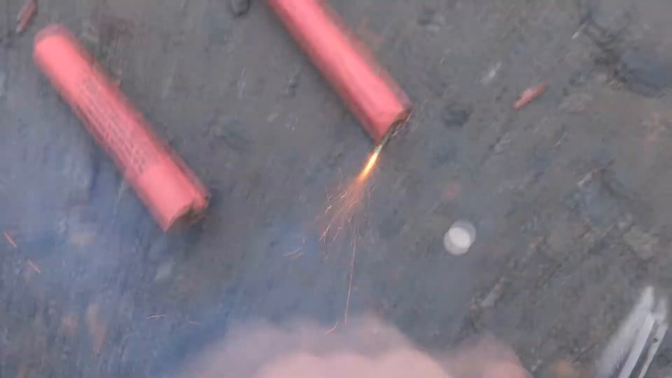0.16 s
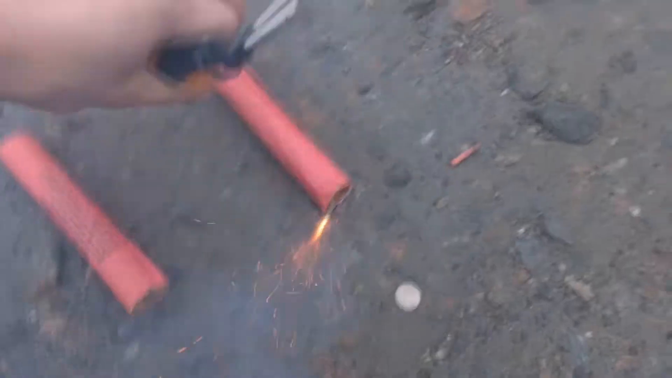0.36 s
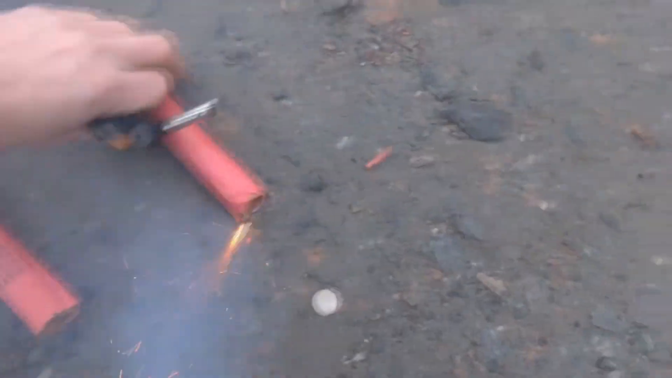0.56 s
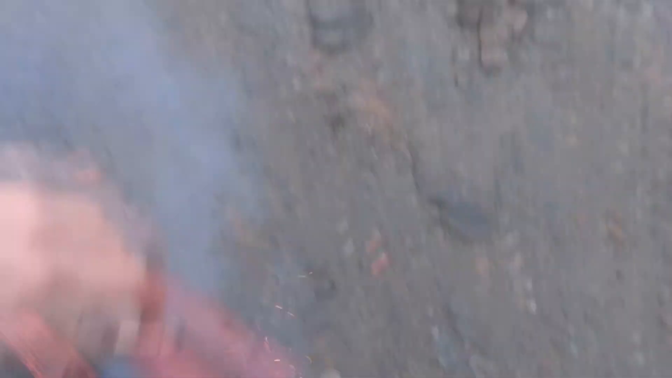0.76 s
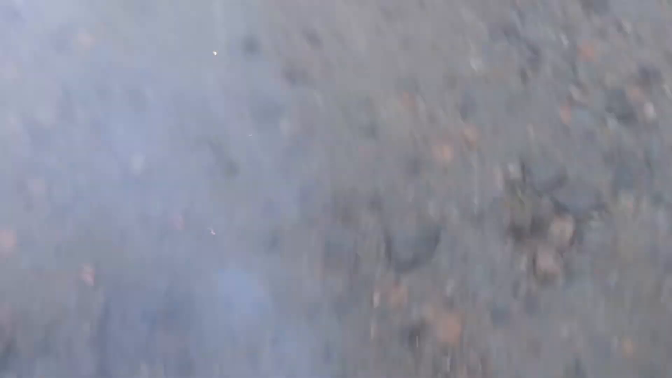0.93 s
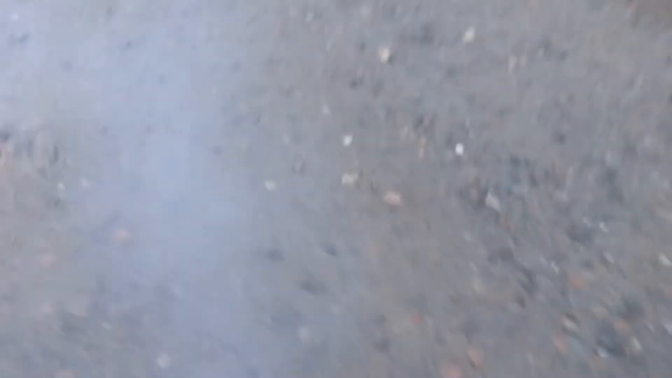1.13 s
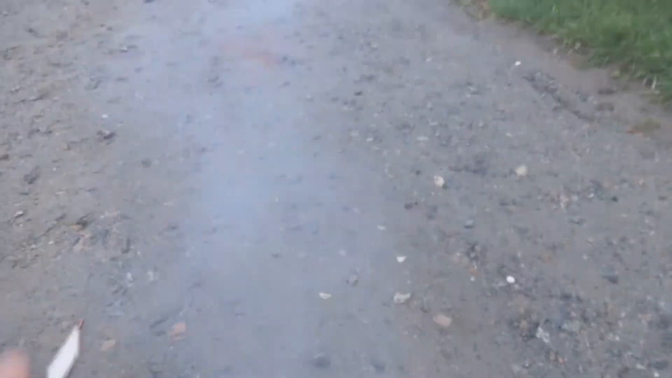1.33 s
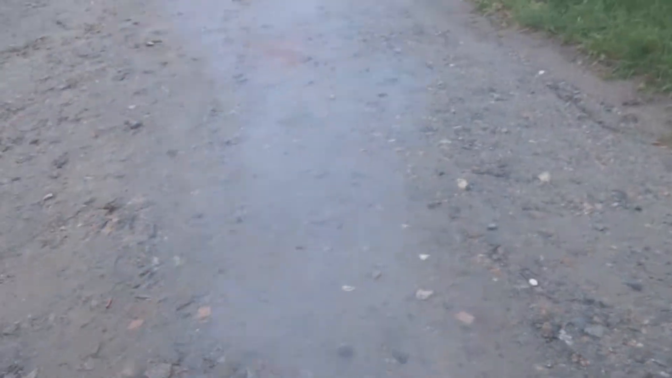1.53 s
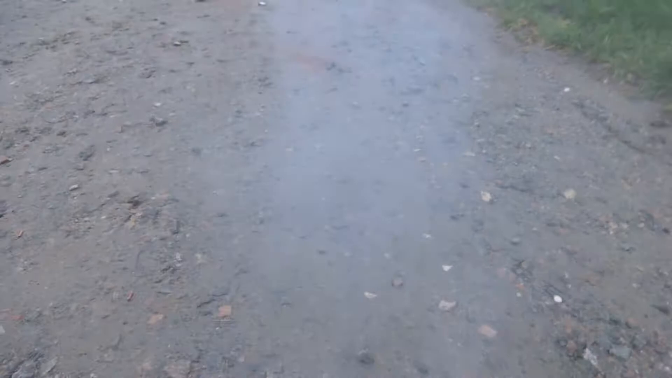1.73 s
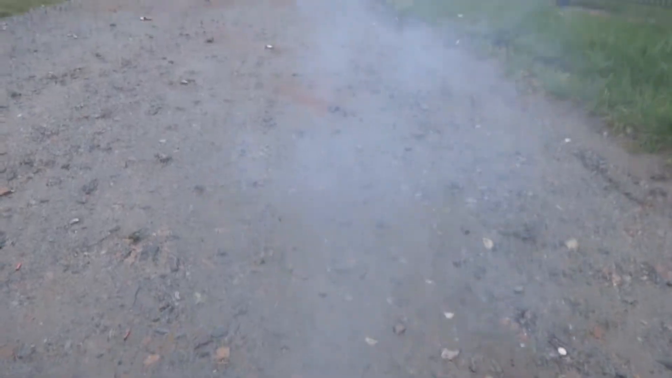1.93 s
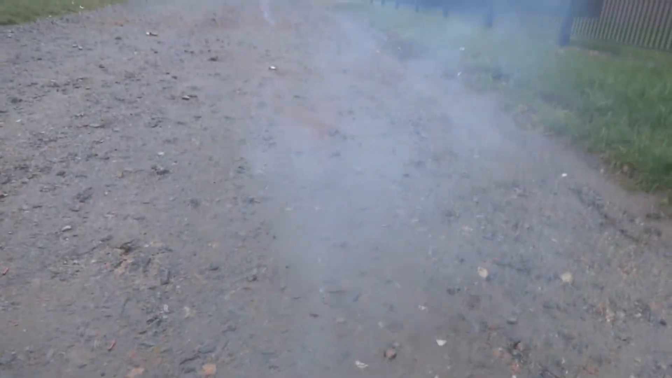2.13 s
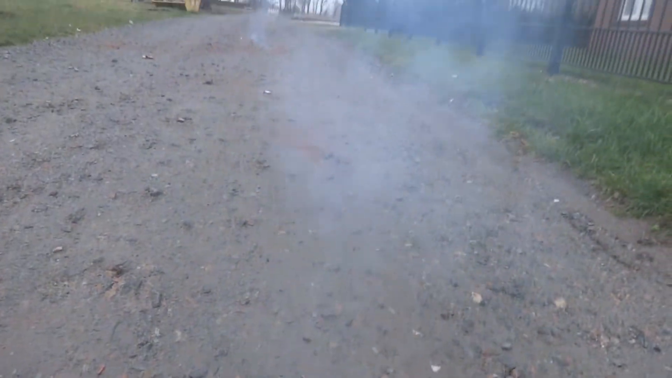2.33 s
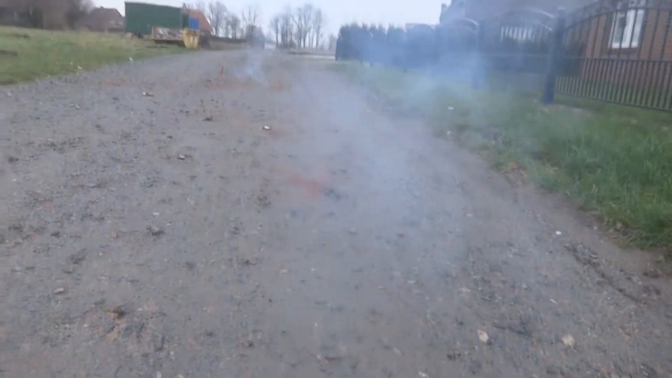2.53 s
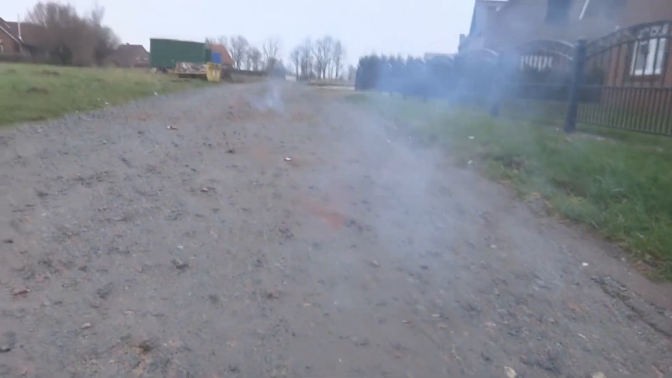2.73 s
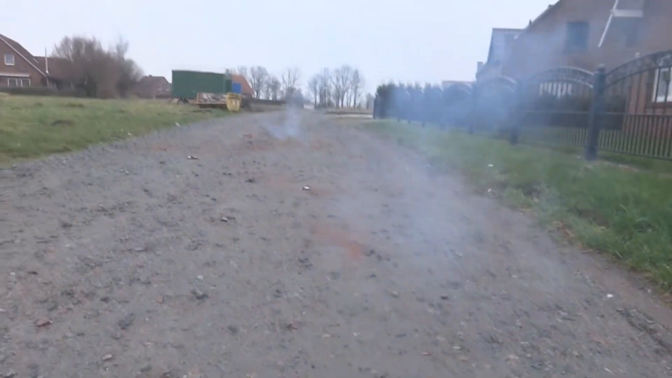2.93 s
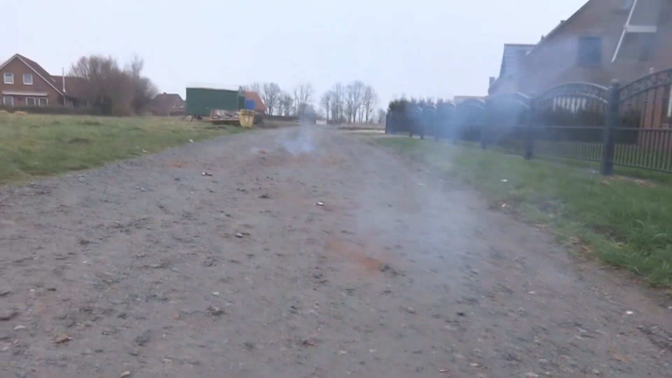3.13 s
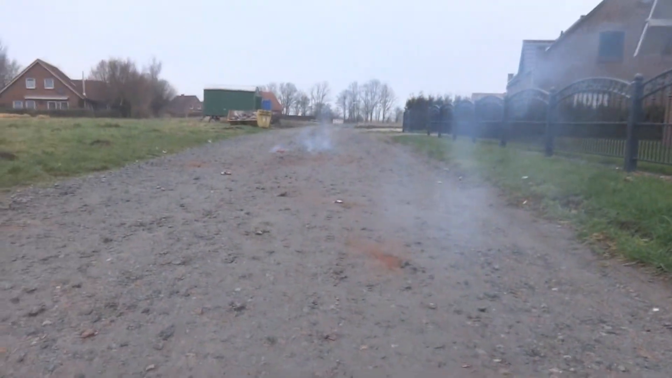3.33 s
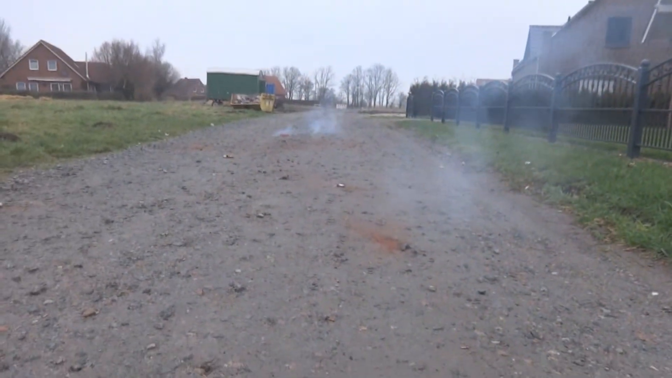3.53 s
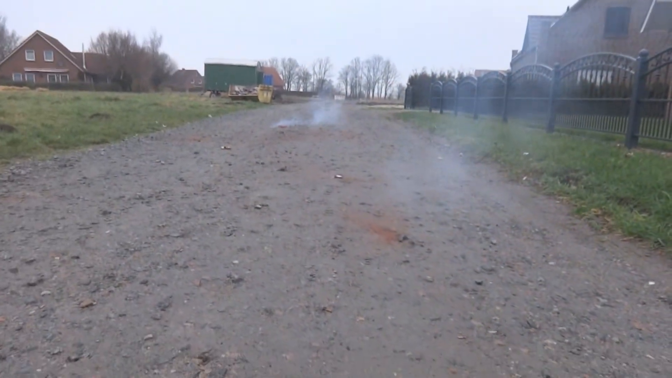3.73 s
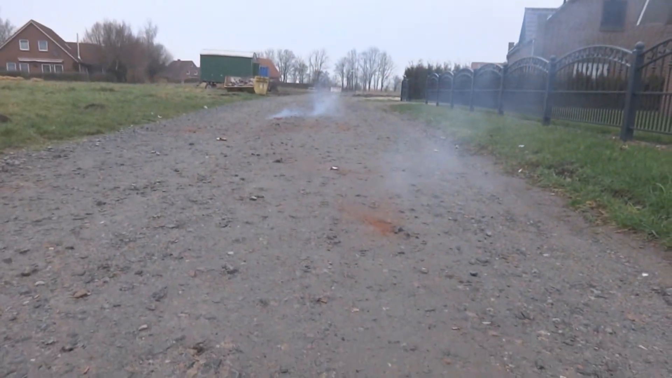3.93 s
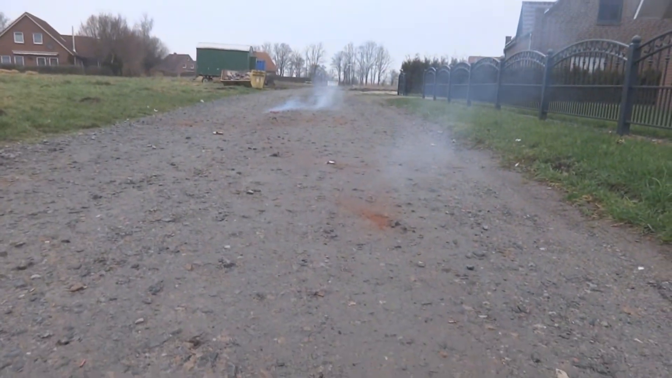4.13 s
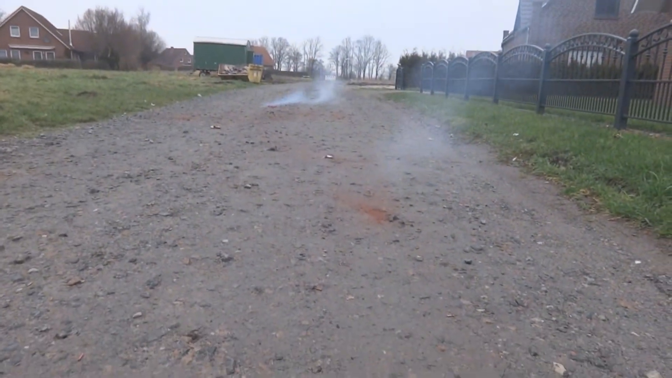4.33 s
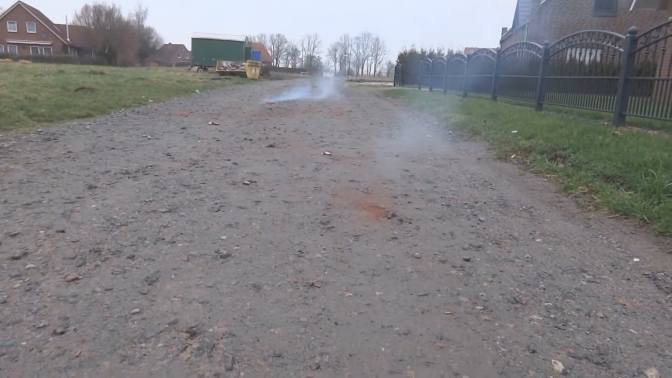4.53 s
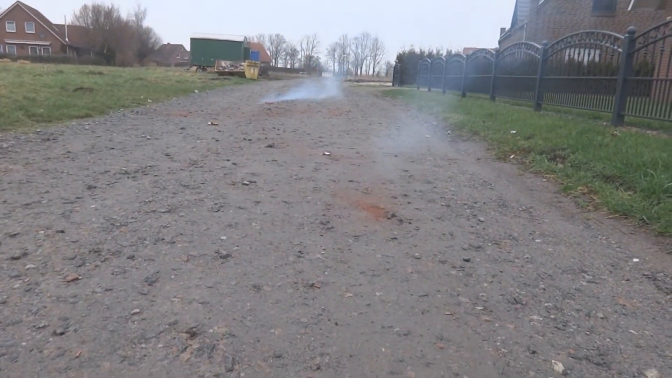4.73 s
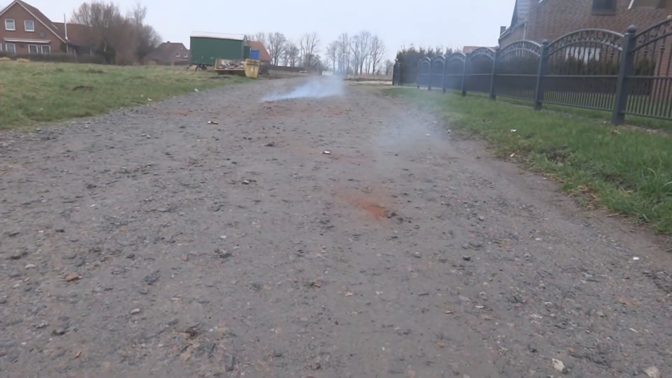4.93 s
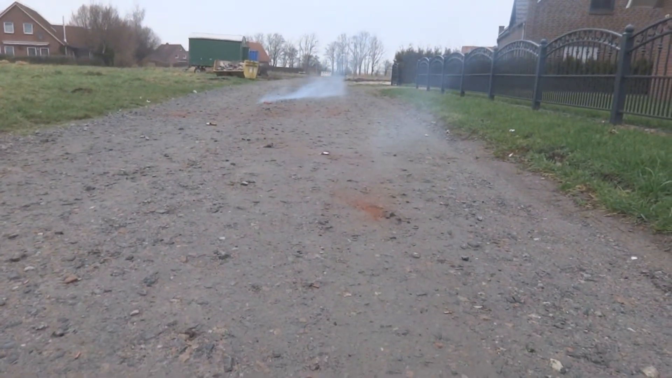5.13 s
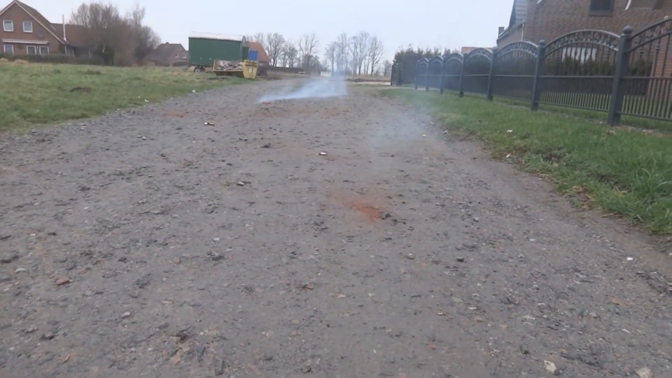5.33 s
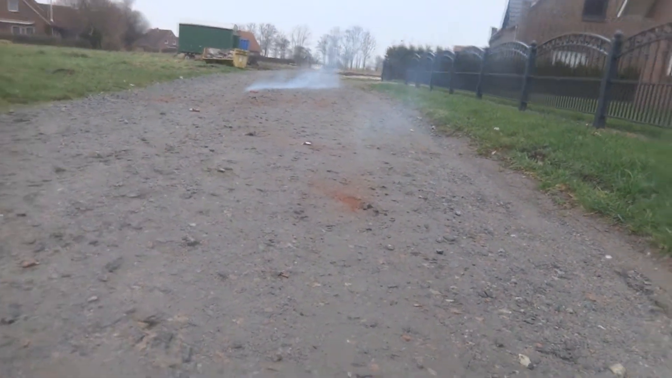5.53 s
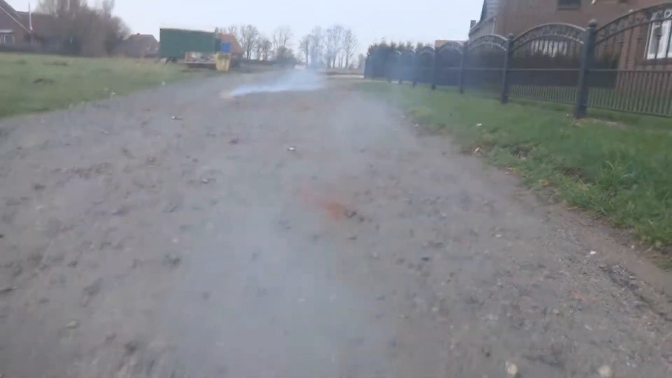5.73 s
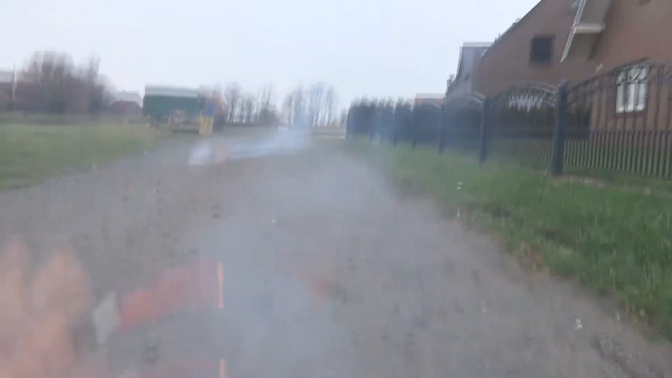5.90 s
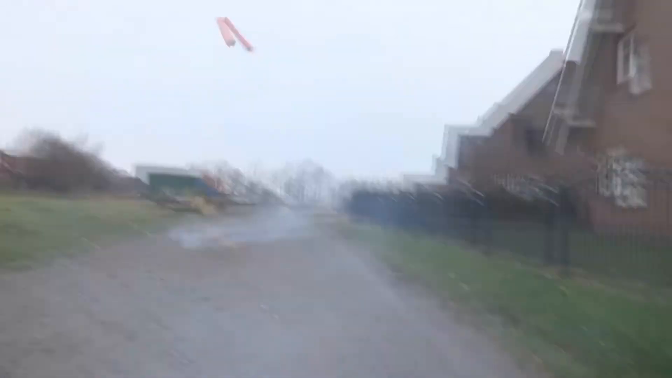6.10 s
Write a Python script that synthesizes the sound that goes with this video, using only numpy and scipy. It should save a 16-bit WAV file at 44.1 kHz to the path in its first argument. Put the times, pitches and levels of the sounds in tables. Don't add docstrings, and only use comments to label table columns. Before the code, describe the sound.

A lit firecracker fuse hisses close by, is thrown, clatters on gravel and sputters far off before a sharp bang echoes off houses.

```python
import sys
import numpy as np
from scipy import signal
from scipy.fft import rfft, irfft, next_fast_len
from scipy.io import wavfile
from scipy.ndimage import uniform_filter1d, map_coordinates

SR = 44100
rng = np.random.default_rng(int(sys.argv[2]) if len(sys.argv) > 2 else 0)


def bounce(signal):
    frames = np.transpose(np.atleast_2d(signal))
    limited = np.clip(frames, -1, 1)
    pcm = np.round(limited * 32767).astype(np.int16)
    wavfile.write(sys.argv[1], SR, pcm)


def invert_db(level):
    return 10 ** (np.asarray(level, dtype=float) / 20)


N = 271876
TIME = np.arange(N) / SR

# pitch in Hz, level in dB per Hz.
VILLAGE_TONE = [(15, -34), (25, -18), (64, -0.5), (246, -9.5), (305, -3.5), (349, -9.5), (613, -23.5),
                (803, -16), (1110, -18), (1230, -12), (1700, -20), (2620, -32), (5720, -22.5), (7280, -38),
                (15500, -48)]
# pitch in Hz, likeness from 0 to 1.
VILLAGE_ALIKE = [(60, 0.98), (180, 1), (550, 0.11), (1650, 0.04), (4970, 0.2), (15000, 0.99)]
FUSE_ALIKE = [(60, 0.82), (180, 1), (550, 0.76), (1650, 0.71), (4970, 0.81), (15000, 0.83)]
ECHO_ALIKE = [(60, 0.98), (180, 0.98), (550, 0.95), (1650, 0.64), (4970, 0.86), (15000, 0.89)]
# pitch in Hz, left over right in dB.
PORT_DB = [(60, 0.5), (110, 0.5), (200, 1.0), (380, 2.0), (700, 2.0), (1290, -1.5), (2380, 0.5),
           (4400, 2.5), (8120, 2.0), (15000, 0.0)]
# pitch in Hz, left ahead of right in radians.
PORT_LEAD = [(0, 0), (340, 0.2), (1460, -0.3), (1980, 0.3), (2330, 0.2), (2580, 0.4), (3880, 0.3),
             (4820, -0.1), (6630, -0.3), (8870, -0.0), (15200, 0.0)]

# start in seconds, level in dB.
HOOTS = [(1.197, -32.5), (1.233, -35), (1.254, -28), (1.276, -39)]
# start in seconds, peak in dB, tube ring in dB, time to fade by 60 dB in seconds.
KNOCKS = [(2.0863, -17, -10, 0.067), (2.0909, -14, -5.5, 0.024), (2.4122, -27, -12, 0.02),
          (2.4148, -21, -16, 0.008), (2.4227, -19, -15.5, 0.017), (2.646, -35, 3.5, 0.024),
          (2.907, -30.5, -8, 0.025), (4.9834, -30, -15, 0.02), (5.1127, -11, -35, 0.0087),
          (5.2784, -28, -34, 0.018)]
# pitch in Hz, level in dB, time to fade by 60 dB in seconds.
TUBE_NOTES = [(1195, 3, 0.019), (750, -9.5, 0.024), (1940, -7, 0.011), (2840, 3.5, 0.0075)]
# pitch in Hz, level in dB, time to fade by 60 dB in seconds.
POP_NOTES = [(2800, -5, 0.0078), (3400, 3.5, 0.0061), (3870, 4, 0.0042), (5000, -4, 0.0089),
             (5830, 0.5, 0.0048), (7000, -24, .005), (10700, -13, .003), (1500, -18, 0.0085),
             (212, -24.5, 0.024)]
POP_S, POP_DB = 3.5324, -6.5

# time in seconds, level in dB.
SECOND_STRENGTH = [(4.965, -71), (4.983, -46.5), (5.1, -39), (5.24, -34), (5.3, -35.5), (5.6, -38),
                   (5.72, -36), (5.86, -38)]
# time in seconds, hiss change in dB, length in seconds.
SECOND_FLARES = [(5.3, 3, 0.13), (5.44, 7, 1), (5.7, 1.5, 0.13)]
# time in seconds, delay in ms, strength from 0 to 1.
SECOND_MIRROR = [(5.0, .255, .3), (5.725, .26, .4), (5.745, .3, .75), (5.79, .39, .75), (5.83, .44, .5),
                 (5.88, .46, .5), (6.1, .6, .2)]
# pitch in Hz, level in dB per Hz.
HELD_TONE = [(47, -46), (80, -1.5), (490, 10.5), (940, 6.5), (1400, 6.5), (2800, -11), (3900, -4),
             (4500, -6), (5300, -10), (6000, -16), (6600, -24.5), (8300, -28.5), (10000, -37.5),
             (15500, -64)]
LIFTED_TONE = [(35, -49), (60, -20), (508, -6), (737, -8), (828, -1), (1090, -10), (2840, -8), (7180, -15),
               (15500, -51)]
# centre in Hz, width in Hz, depth (1 is complete).
HELD_NOTCH = [(4700, 420, 0.96), (9150, 550, 0.48)]
LIFTED_S = 5.74

# time in seconds, level in dB.
THROWN_STRENGTH = [(0, -26), (.05, -18.5), (.3, -21), (.78, -19.5), (.83, -23.5), (.88, -23), (1.03, -24.5),
                   (1.09, -29), (1.2, -36), (1.34, -39.5), (1.67, -44.5), (2.07, -49.5), (2.75, -51.5),
                   (2.95, -55.5), (3.5, -58.5), (4.3, -60), (4.95, -57.5)]
# time in seconds, hiss change in dB, length in seconds.
THROWN_FLARES = [(.22, 1.5, 0.15), (.64, -1.5, 0.23), (.94, -2.5, 0.076), (1.03, 0.5, 0.051),
                 (2.47, 8, 0.25), (2.91, 12.5, .3), (3.2, 10, 1), (4.17, 8, 0.32)]
# pitch in Hz, level in dB per Hz.
NEAR_TONE = [(35, -58), (60, -29.5), (200, -12), (850, -5.5), (1350, -1), (2000, -6.5), (3000, -2),
             (4200, 1), (4850, -2.5), (5400, -10), (6300, -9.5), (7800, -19.5), (9300, -24.5),
             (12300, -34.5), (15500, -38)]
FLYING_TONE = [(90, -21), (200, -4), (580, -2), (1060, 0.5), (2300, -12.5), (3300, -3.5), (4200, -2.5),
               (5400, -5), (6500, -12), (8500, -22.5), (13000, -36), (15500, -42)]
LYING_TONE = [(200, -30), (500, -24.5), (1150, -18.5), (1600, -28), (2500, -15.5), (3200, -4.5),
              (3800, 1.5), (4500, -5.5), (5500, 2), (6200, 0), (6700, -7), (7400, -2), (9000, -16),
              (13000, -24), (15500, -36)]
# centre in Hz, width in Hz, depth (a minus depth is a peak).
NEAR_NOTCH = [(2470, 280, .8), (4990, 520, .88), (8150, 500, .5), (10190, 800, .95)]
RAISED_NOTCH = [(2150, 700, -.6), (4600, 600, -1.1), (5350, 500, .6), (9300, 1500, .6)]
LYING_NOTCH = [(4940, 120, 0.98), (6500, 310, 0.5), (7530, 360, 0.9)]
TUMBLE_S, FACING_S, TUMBLE_DB = 0.27, 1.48, 1.5
FLARE_RISE_S, FLARE_HOLD = 0.1, 0.43

LOW_LAG_MS, RAISE_S, DOUBLE_S = .2, .785, .1
LET_GO_S, AIR_S, HAND_M, CAMERA_M, START_M, SPEED_M_PER_S = 1.09, 1., .47, 1.95, 2.5, 20.5
COPY_HELD, COPY_SWUNG, COPY_FREE, COPY_DOWN = .1, .4, .52, .4
BOUNCING_LAG_MS, LYING_LAG_MS, SETTLED_S = .185, .23, 2.83

# start in seconds, level in dB, swing in Hz, time to fade by 60 dB in seconds, crack in dB.
BANGS = [
    (5.8833, -1.5, 1050, .025, -7),
    (5.8894, -8, 1300, .015, 1),
    (6.1288, -6, 1050, .006, -24),
    (6.1586, -4, 600, .03, -26),
]
# start in seconds, pitch in Hz, level in dB, length in seconds.
FLUTTERS = [(5.961, 2480, -21.5, 0.047), (5.977, 2020, -19, 0.045), (6.008, 3680, -28, .03),
            (6.033, 3620, -17, 0.029), (6.068, 4000, -15, 0.032), (6.096, 4320, -20, .018)]
# time in seconds, level in dB.
ROLL = [(5.886, -16.5), (5.936, -14.5), (6.018, -13), (6.072, -19.5), (6.082, -15), (6.146, -24),
        (6.164, -14.5)]
# pitch in Hz, level in dB per Hz.
ROLL_TONE = [(24, -57), (40, -29.5), (241, -6), (309, -8), (386, -5), (484, -7.5), (521, -5), (1130, -5),
             (2160, -17.5), (3300, -14), (3550, -11), (6000, -25.5), (15500, -68.5)]
ROLL_TOP_DB, FRESH_DB, FRESH_S = -5.5, 11, 0.024


def unit(x):
    return x / np.sqrt(np.mean(x ** 2) + 1e-20)


def along(points, hz):
    f, v = np.transpose(points)
    return np.interp(np.log(hz + 1), np.log(f + 1), v)


def curves(rows):
    s, *columns = np.transpose(rows)
    return np.array([np.interp(TIME, s, column) for column in columns])


def wobble(rate):
    knots = rng.standard_normal(int(N * rate / SR) + 4)
    return map_coordinates(knots, [TIME * rate])


def filtered(x, response):
    m = next_fast_len(N + 8192)
    return irfft(rfft(x, m) * response(np.fft.rfftfreq(m, 1 / SR)), m)[..., :N]


def add(track, s, sound):
    spot = track[round(s * SR):][:len(sound)]
    spot += sound[:len(spot)]


def ring(notes, t):
    return sum(invert_db(db - 60 * t / t60) * np.sin(2 * np.pi * hz * t) for hz, db, t60 in notes)


def onset(t, rise_s):
    return 1 - np.exp(-t / rise_s)


def shade(notches, hz):
    gain = 0 * hz + 1
    for centre, width, depth in notches:
        gain = gain * (1 - np.minimum(depth, 1) / (1 + (2 * (hz - centre) / width) ** 2))
    return gain


def stereo_noise(alike, patchy_db):
    z = signal.stft(rng.standard_normal((2, N)), nperseg=512)[2]
    patches = uniform_filter1d(rng.standard_normal(z.shape[1:]), size=6, axis=0)
    patches = uniform_filter1d(patches, size=8, axis=1)
    pair = signal.istft(z * invert_db(patchy_db * unit(patches)), nperseg=512)[1][:, :N]

    def shares(hz):
        turn = np.arccos(np.clip(along(alike, hz), -1, 1)) / 2
        return np.array([np.cos(turn), np.sin(turn)])
    mid, side = filtered(pair, shares)
    return np.array([mid + side, mid - side])


def bands(noise, tone, edges_hz, notches=()):
    def response(hz):
        highs = [1 / (1 + (edge / (hz + 1)) ** 6) for edge in edges_hz]
        above = np.array([0 * hz + 1] + highs + [0 * hz])
        return (-np.diff(above, axis=0) * invert_db(along(tone, hz)) * shade(notches, hz))[:, None]
    return [unit(part) for part in filtered(noise, response)]


def outdoors():
    hum, air = bands(stereo_noise(VILLAGE_ALIKE, patchy_db=1.5), VILLAGE_TONE, (2000,))
    return invert_db(-53 + 0.47 * wobble(3.2)) * hum + invert_db(-59) * air


def whirl():
    hoots, t = np.zeros(N), np.arange(1800) / SR
    for s, db in HOOTS:
        add(hoots, s, invert_db(db) * onset(t, 0.0044) * ring([(599, 7.0, 0.044)], t))
    return hoots


def powder_pop(grit, tube, t):
    for lag, db in [(-.0005, -12), (0, 5), (.0007, -2), (.0014, -8)]:
        add(tube, POP_S + lag, invert_db(POP_DB + db - 7.0) * onset(t, 0.0003) * ring(POP_NOTES, t))
    mouth = ring([(2870, 0, 0.0065)], t)
    add(tube, POP_S + 0.00259, invert_db(POP_DB - 9.0) * onset(t, 0.0005) * mouth)
    scatter = invert_db(POP_DB - 20 - 60 * t / 0.1) * rng.standard_normal(len(t))
    add(grit, POP_S + 0.0022, scatter)


def knocks():
    grit, tube, t = np.zeros(N), np.zeros(N), np.arange(2600) / SR
    for s, db, ring_db, t60 in KNOCKS:
        fade = invert_db(db - 0.5 - 60 * t / max(t60, .002))
        add(grit, s + 0.00068, fade * onset(t, 0.00042) * rng.standard_normal(len(t)))
        add(tube, s + 0.000643, invert_db(db + ring_db) * onset(t, 0.00042) * ring(TUBE_NOTES, t))
    powder_pop(grit, tube, t)

    def grit_tone(hz):
        return invert_db(np.minimum(along(FLYING_TONE, hz) + 4, 0)) * hz ** 2 / (hz ** 2 + 2000 ** 2)
    both = tube + invert_db(0.5) * filtered(grit, grit_tone)
    return filtered(both, lambda hz: 1 / (1 + (hz / 12500) ** 12))


def turbulence(sputter_db):
    sputter = invert_db(sputter_db * (0.32 * wobble(16) + 0.52 * wobble(60) + 0.8 * wobble(350)))
    alike = [(hz, likeness ** 0.22) for hz, likeness in FUSE_ALIKE]
    return unit(sputter) * stereo_noise(alike, patchy_db=1.5)


def flares(rows):
    total = 0
    for s, db, length in rows:
        corners = [s - FLARE_RISE_S, s, s + FLARE_HOLD * length, s + length]
        total = total + db * np.interp(TIME, corners, [0, 1, 1, 0])
    return total


def jet(noise, strength_db, flare_db, tone, notches=(), *, roar_db, fizz_db, sharper):
    roar, hiss, fizz = bands(noise, tone, (2000, 6500), notches)
    mix = invert_db(roar_db) * roar + invert_db(flare_db) * hiss + invert_db(fizz_db + sharper * flare_db) * fizz
    return invert_db(strength_db) * mix


def off_ground(direct, mirror, top_hz):
    lag_ms, strength = mirror
    lag_ms = lag_ms * (1 + .015 * wobble(20))
    strength = np.clip(strength * invert_db(2.5 * wobble(12)), 0, 1)

    def gravel(hz):
        return (.62 + .4 / (1 + (2000 / (hz + 1)) ** 4)) / (1 + (hz / top_hz) ** 6)
    dull = filtered(direct, gravel)
    late = np.array([np.interp(TIME - lag_ms / 1000, TIME, side) for side in dull])
    return (direct + strength * late) / np.sqrt(1 + strength ** 2)


def second_fuse():
    lit = np.interp(TIME, [4.972, 4.98, 5.06], [0, .6, 1])
    up = np.clip((TIME - LIFTED_S) / .03 + .5, 0, 1)
    drive = turbulence(sputter_db=1.4), curves(SECOND_STRENGTH)[0], flares(SECOND_FLARES)
    held = jet(*drive, HELD_TONE, HELD_NOTCH, roar_db=0.17, fizz_db=-24, sharper=2.76)
    lifted = jet(*drive, LIFTED_TONE, HELD_NOTCH, roar_db=-0.41, fizz_db=-14.5, sharper=1.2)
    return lit * off_ground((1 - up) * held + up * lifted, curves(SECOND_MIRROR), top_hz=4300)


def flight():
    u = np.clip(TIME - LET_GO_S, 0, AIR_S)
    high = .03 + HAND_M * (1 - u / AIR_S) + 9.81 / 2 * u * (AIR_S - u)
    far = START_M + SPEED_M_PER_S * u
    extra_m = np.hypot(far, high + CAMERA_M) - np.hypot(far, high - CAMERA_M)
    arc_ms = extra_m / .343
    swing_ms = LOW_LAG_MS * 2 ** (np.clip(TIME - RAISE_S, 0, 1) / DOUBLE_S)
    settling = [SETTLED_S - .07, SETTLED_S + .07]
    down_ms = np.interp(TIME, settling, [BOUNCING_LAG_MS, LYING_LAG_MS])
    moments = [RAISE_S, RAISE_S + .05, LET_GO_S + .3 * AIR_S, LET_GO_S + .8 * AIR_S, LET_GO_S + AIR_S]
    strength = np.interp(TIME, moments, [COPY_HELD, COPY_SWUNG, COPY_FREE, COPY_FREE, COPY_DOWN])
    return np.minimum(swing_ms, np.maximum(arc_ms, down_ms)), strength


def thrown_fuse():
    noise, strength_db = turbulence(sputter_db=0.96), curves(THROWN_STRENGTH)[0]
    drive = noise, strength_db, flares(THROWN_FLARES)
    tumble_db = TUMBLE_DB * np.cos(2 * np.pi * (TIME - FACING_S) / TUMBLE_S)
    near = jet(*drive, NEAR_TONE, NEAR_NOTCH, roar_db=-7, fizz_db=-14, sharper=3.4)
    raised = jet(*drive, NEAR_TONE, RAISED_NOTCH, roar_db=-4.5, fizz_db=-9.5, sharper=2.5)
    flying = jet(noise, strength_db, tumble_db, FLYING_TONE, roar_db=-7.5, fizz_db=-18.5, sharper=2.2)
    lying = jet(*drive, LYING_TONE, LYING_NOTCH, roar_db=0.33, fizz_db=-23, sharper=0.55)
    up = np.interp(TIME, [.78, .86], [0, 1])
    away = np.interp(TIME, [1.0, 1.1], [0, 1])
    down = np.interp(TIME, [1.9, 2.15], [0, 1])
    whole = (1 - up) * near + (up - away) * raised + (away - down) * flying + down * lying
    return off_ground(whole, flight(), top_hz=6800)


def flutters():
    out = np.zeros(N)
    for s, hz, db, length in FLUTTERS:
        t = np.arange(round(length * SR)) / SR
        add(out, s, invert_db(db) * np.sin(np.pi * t / length) * np.sin(2 * np.pi * hz * t * (1 - .3 * t)))
    return out * (.35 + .5 * wobble(300))


def house_roll():
    low_db = curves(ROLL)[0]
    high_db = low_db + ROLL_TOP_DB + FRESH_DB * np.exp(-np.abs(TIME - ROLL[0][0]) / FRESH_S)
    lumps = unit(invert_db(2.1 * wobble(170) + .6 * wobble(45)))
    low, high = bands(lumps * stereo_noise(ECHO_ALIKE, patchy_db=1.5), ROLL_TONE, (2000,))
    arrived = np.interp(TIME, [5.885, 5.893], [0, 1])
    return arrived * (invert_db(low_db - 2.5) * low + invert_db(high_db - 4.5) * high)


def blast():
    sharp, t = np.zeros(N), np.arange(1300) / SR
    for s, db, hz, t60, crack_db in BANGS:
        rough = uniform_filter1d(uniform_filter1d(rng.standard_normal(len(t)), size=4), size=3)
        crack = invert_db(crack_db - 60 * t / 0.048) * rough
        swing = ring([(hz, 0, t60), (3700, -13, .012)], t)
        add(sharp, s, invert_db(db) * onset(t, 0.000086) * (swing + crack))
    fence_hz = 3600 + 4600 * np.exp(-t / .0036)
    chirp = np.sin(2 * np.pi * np.cumsum(fence_hz) / SR)
    add(sharp, 5.892, invert_db(-14 - 60 * t / .09) * onset(t, .0015) * chirp)
    return 0.7 * sharp + flutters() + house_roll()


def scene():
    ducked = invert_db(np.interp(TIME, [5.877, 5.881], [0, -12]))
    quiet = ducked * (outdoors() + whirl() + knocks() + second_fuse() + thrown_fuse())
    air = quiet * invert_db([[.4], [-.4]]) + blast() * invert_db([[-1.1], [1.1]])

    def openings(hz):
        half = invert_db(along(PORT_DB, hz) / 2) * np.exp(.5j * along(PORT_LEAD, hz))
        return np.array([half, 1 / half])
    return filtered(air, openings)


def top_cut(x):
    return signal.sosfilt(signal.butter(12, 15610, fs=SR, output="sos"), x)


def record(dry):
    limited = dry / (1 + np.abs(dry / .9) ** 4) ** (1 / 4)
    finished = filtered(limited, lambda hz: hz < 15620)
    return top_cut(finished)


dry = scene()
out = record(dry)
bounce(out)
```